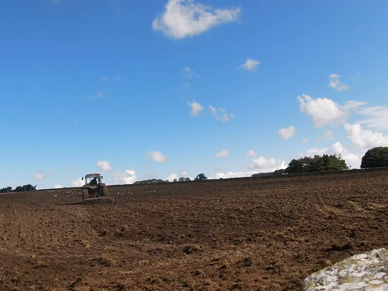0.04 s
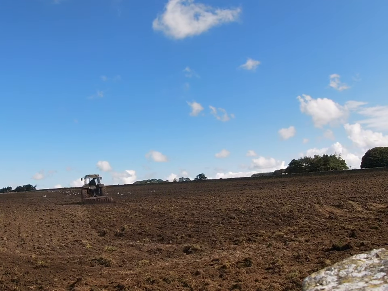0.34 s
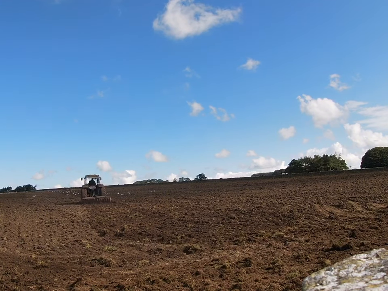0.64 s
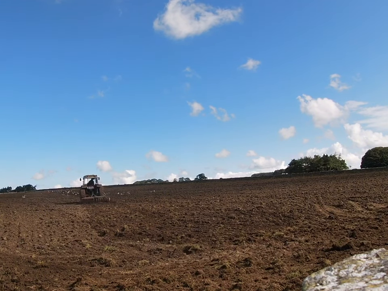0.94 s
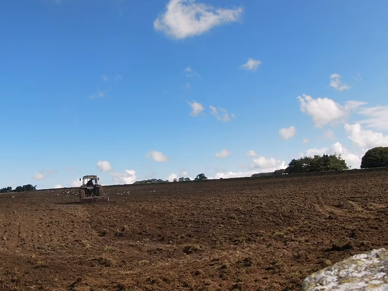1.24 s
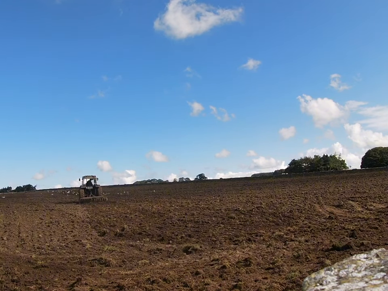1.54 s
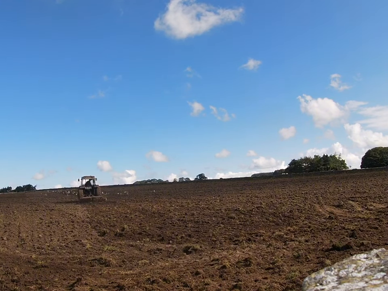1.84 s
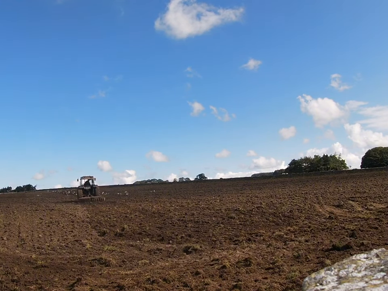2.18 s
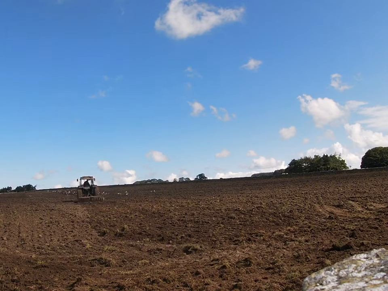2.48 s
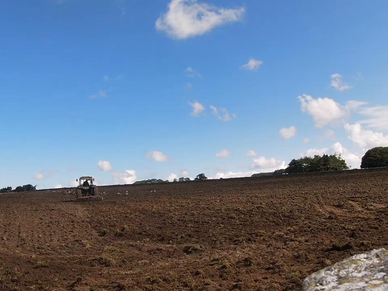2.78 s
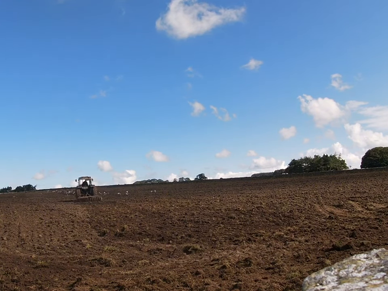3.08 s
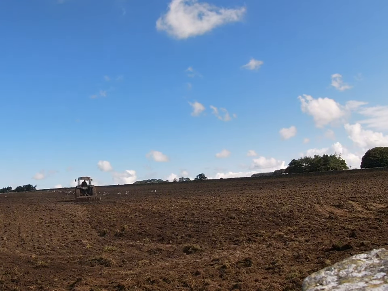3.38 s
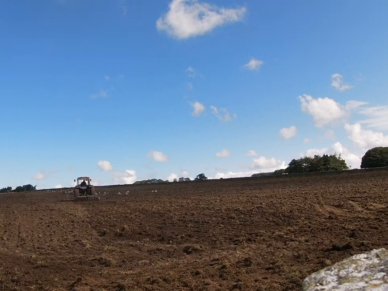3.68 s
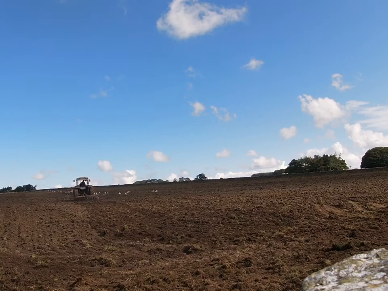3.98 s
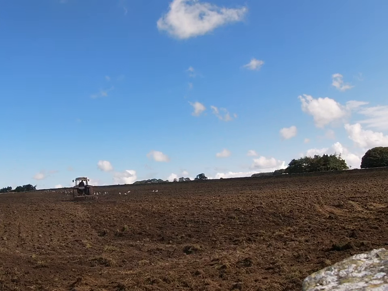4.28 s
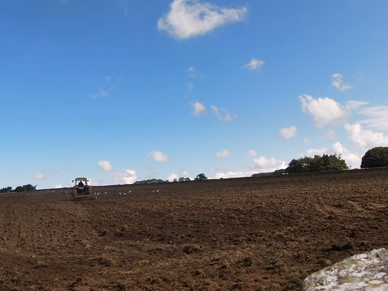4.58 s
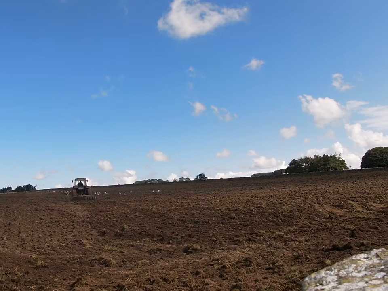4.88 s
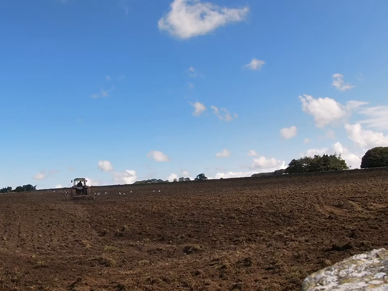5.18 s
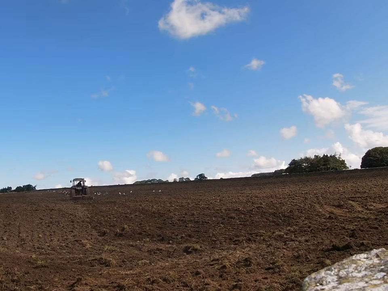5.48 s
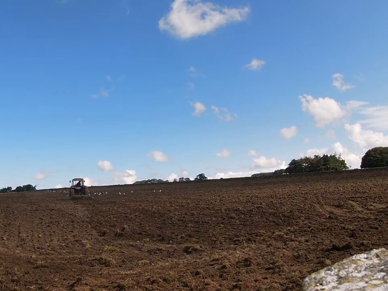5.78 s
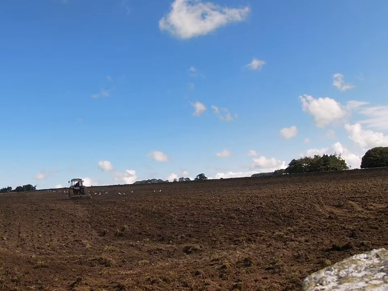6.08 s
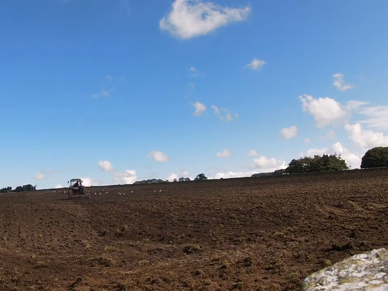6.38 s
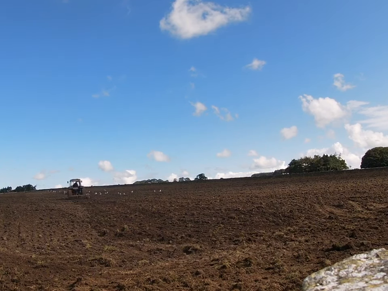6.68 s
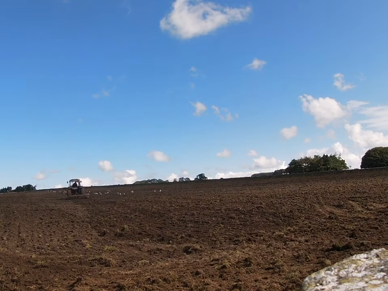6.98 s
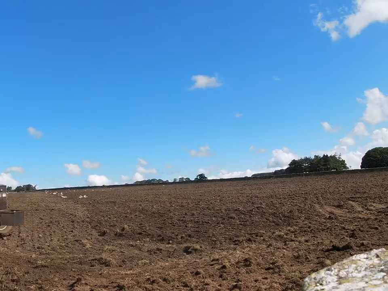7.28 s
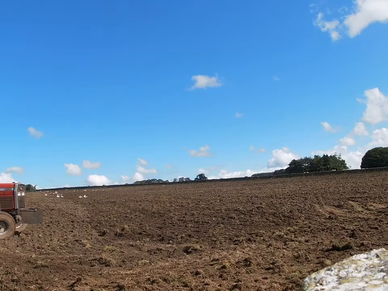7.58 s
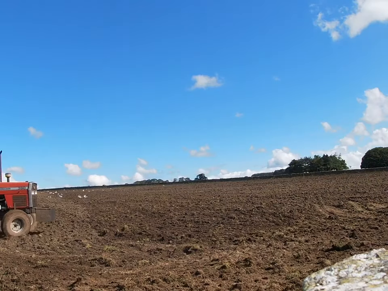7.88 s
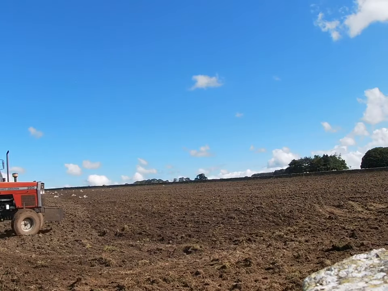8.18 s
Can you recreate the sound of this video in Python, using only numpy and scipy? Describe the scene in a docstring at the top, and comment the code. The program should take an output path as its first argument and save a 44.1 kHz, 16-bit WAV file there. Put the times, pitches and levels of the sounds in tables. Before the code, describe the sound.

From the start, a diesel tractor works far off in an open field: a steady low exhaust drone with lighter rattle and faint gear whine, slowly fading as it moves away. Soil hisses softly along its harrow discs, and stones clink, clank and scrape against the steel at irregular moments, thickest in the first five seconds. A dry bearing gives brief, faint squeaks at about 1.6, 2.5, 3.6, 5.9, 6.5 and 7.2 seconds. Short, low wind gusts thump the microphone around 6 and 6.9 seconds. At about 7.2 seconds the soil and stones stop and the tractor is abruptly close and much louder, with hard diesel knocking under a booming bonnet. The engine picks up until about 7.6 seconds, then sags slightly, while a few more gusts bump the microphone. The radiator fan's rush swells just before the end, at about 8.3 seconds.

```python
"""Far off, a four-cylinder diesel tractor drags disc harrows away over a ploughed field. Its exhaust
drones, soil hisses along the discs, stones clank against them and dry bearings squeak.
From about six seconds on, a few gusts thump the microphone. Just after seven the scene cuts to the
tractor close by: the engine picks up and sags, clattering loudly under a booming bonnet,
and at the very end the radiator fan swells as the nose rolls past."""
import sys
import numpy as np
from scipy import signal
from scipy.fft import rfft, irfft, next_fast_len
from scipy.io import wavfile
from scipy.ndimage import uniform_filter1d, map_coordinates

SR = 44100
rng = np.random.default_rng(int(sys.argv[2]) if len(sys.argv) > 2 else 0)


def inscribe(sig):
    """Save sig as 16-bit PCM at rate SR to the path in sys.argv[1].

    A 1-D sig is mono; a 2-D sig holds one channel per row.
    Samples are clipped to [-1, 1] before scaling.
    """
    pcm = np.round(np.clip(np.atleast_2d(sig).T, -1, 1) * 32767)
    wavfile.write(sys.argv[1], SR, pcm.astype(np.int16))


N = 367794
CLOSE_FROM_S = 7.185
START_M, SPEED_M_PER_S = 30.4, 1.66  # the distant tractor drives straight away


def amp(db):
    """Decibels to gain."""
    return 10 ** (np.asarray(db) / 20)


def unit(x):
    """x scaled to rms 1."""
    return x / np.sqrt(np.mean(x ** 2) + 1e-20)


def clock():
    """The time of each sample in seconds."""
    return np.arange(N) / SR


def curves(rows):
    """One automation curve for each column after the time."""
    times, *columns = np.transpose(rows)
    return [np.interp(clock(), times, column) for column in columns]


def wobble(rate):
    """A smooth random curve, rate knots a second."""
    return map_coordinates(rng.standard_normal(int(N * rate / SR) + 4), [clock() * rate])


def filtered(x, response):
    """x through a gain given as a function of frequency."""
    size = next_fast_len(N + SR // 2)
    return irfft(rfft(x, size) * response(np.fft.rfftfreq(size, 1 / SR)), size)[:N]


def coloured(x, spectrum, rings=()):
    """x through a broad EQ with resonances standing on it, at rms 1."""
    hz, db = np.transpose(spectrum)
    broad = lambda f: np.interp(np.log(f + 1), np.log(hz), db)
    peaks = lambda f: sum(lift / (1 + (2 * (f - centre) / width) ** 2) for centre, width, lift in rings)
    return unit(filtered(x, lambda f: amp(broad(f) + peaks(f))))


def patchy(x, depth_db, size=512):
    """x with random patches of gain in time and frequency."""
    bins = signal.stft(x, nperseg=size)[2]
    patches = uniform_filter1d(rng.standard_normal(bins.shape), size=5, axis=0)
    patches = uniform_filter1d(patches, size=7, axis=1)
    return signal.istft(bins * amp(depth_db * unit(patches)), nperseg=size)[1][:N]


def add(track, start_s, sound):
    """Mix a short sound into the track."""
    part = track[round(start_s * SR):][:len(sound)]
    part += sound[:len(part)]


def spreading_db(s):
    """The level falls as the distance grows."""
    return -20 * np.log10(1 + SPEED_M_PER_S * s / START_M)


def exhaust(firings, orders, firing_db, octave_db, upper_db, waver_db, rumble_db):
    """A drone at the firing rate and its octave; above it, higher tones in turbulent rumble."""
    # Turbulence in the pipe. Each row: frequency in Hz, relative level in dB.
    rumble_eq = [(8, -16.5), (25, -5.5), (65, 9), (95, 1), (130, 5), (185, 0.5), (240, -12), (330, -21.5),
                 (800, -79.5)]
    # the silencer shifts the phase of the higher tones more
    tone = lambda k: np.sqrt(2) * np.cos(2 * np.pi * k * firings + k * k / 3)
    upper = unit(sum(amp(db + waver_db * (0.5 - db / 10) * wobble(14)) * tone(k) for k, db in orders))
    rumble = amp(rumble_db) * coloured(rng.standard_normal(N), rumble_eq)
    burn_db = 0.7 * wobble(35)  # no two firings are equally strong
    drone = amp(firing_db) * tone(1) + amp(octave_db) * tone(2)
    return amp(burn_db) * drone + amp(upper_db) * (upper + rumble)


def clatter(firings, repeat_share, knock_depth, throb_depth, scatter_db):
    """Pistons, valves and injectors knock four times a firing; part of the rattle repeats each cycle."""
    # No two cylinders burn alike. Each entry: one cylinder's trim in dB, in firing order.
    cylinder_db = [0.77, -0.079, 0.11, -0.22]
    cycle = rng.standard_normal(3600)  # one engine cycle, four firings long
    looped = map_coordinates(cycle, [firings / 4 % 1 * len(cycle)], mode="grid-wrap")
    rattle = np.sqrt(repeat_share) * unit(looped) + np.sqrt(1 - repeat_share) * rng.standard_normal(N)
    knocks = firings * 4
    strength = amp(scatter_db * rng.standard_normal(2 ** 12))[knocks.astype(int)]
    blows = 1 + knock_depth * strength * np.exp(-np.pi * (knocks % 1))
    throb = 1 + throb_depth * np.sin(2 * np.pi * firings)  # knocks nearest combustion hit hardest
    return rattle * blows * throb * amp(cylinder_db)[firings.astype(int) % 4]


def gears(firings, meshes, waver_db, backlash):
    """Gear teeth whine in step with the engine; their play unsettles the tones."""
    tone = lambda k: np.sqrt(2) * np.sin(2 * np.pi * k * firings + backlash * wobble(25))
    return sum(amp(db + waver_db * wobble(8)) * tone(k) for k, db in meshes)


def far_tractor(governed_hz=46.65, hunt_hz=.33, ground_hz=450, ground_dip=0.35):
    """From behind and far off, the exhaust drone outweighs the clatter, which drifts in the breeze."""
    # Upper exhaust tones and gear tones. Each row: multiple of the firing rate, relative level in dB.
    orders = [(3, -14), (3.5, -34), (4, -22), (5, -35), (5.6, -39), (6, -42)]
    meshes = [(11, -20), (11.85, -19), (12.6, -25), (17.75, -22), (20, -20), (21.15, -11), (21.9, -21),
              (25, -19), (26.6, -17), (31.5, -21), (38.5, -22), (42, -20)]
    # The clatter from behind. Each row: frequency in Hz, relative level in dB.
    rear_eq = [(150, -8.5), (300, -8.5), (420, 1), (520, 1), (760, -2), (1100, -4), (1200, -4), (1650, -6),
               (1950, -9), (2150, -6.5), (3600, -10.5), (5000, -23.5), (7700, -27), (8200, -41),
               (12000, -61), (14000, -85)]
    # Ringing panels and castings. Each row: centre in Hz, width in Hz, boost in dB.
    rear_rings = [(518, 14, 4), (680, 14, 2), (834, 26, 1.5), (966, 110, 5), (1223, 140, 6), (1473, 140, 6),
                  (1810, 130, 9), (1958, 50, 7)]
    # The fader on the gear whine. Each row: time in seconds, gain in dB.
    whine_fader = [(0, 2), (1.0, 2), (1.6, -2), (3.0, -2), (4.1, 1.5), (4.7, -4.5), (6.0, -3.5), (6.9, 1.5)]
    t = clock()
    firings = np.cumsum(governed_hz + hunt_hz * wobble(3.2)) / SR  # the governor hunts
    driven_m = SPEED_M_PER_S * t
    upper_db = -41.5 - 0.2845 * driven_m  # soft ground takes its share on top of spreading
    clatter_db = -47 - 0.05 * driven_m
    drone = exhaust(firings, orders, firing_db=-26.5, octave_db=-33.5, upper_db=upper_db,
                    waver_db=.5, rumble_db=-0.5)
    knocking = clatter(firings, repeat_share=.28, knock_depth=.45, throb_depth=.14, scatter_db=3)
    rattle = coloured(patchy(knocking, depth_db=0.75, size=2048), rear_eq, rear_rings)
    # the ground swallows the low mids as the distance grows
    low_mids = filtered(rattle, lambda hz: np.exp(-(2 * np.log((hz + 1) / ground_hz)) ** 2))
    rattle -= np.linspace(0, ground_dip, N) * low_mids
    whine = amp(curves(whine_fader)[0]) * gears(firings, meshes, waver_db=3, backlash=0.9)
    breeze_db = 0.37 * wobble(10)
    return amp(spreading_db(t)) * (drone + amp(clatter_db + breeze_db) * (rattle + whine))


def soil(grits_per_s=80, grit_db=-3, grit_decay_s=0.0032, bite_db=2, crumble_db=1.6, trim_db=3.5):
    """Crumbling earth hisses along the discs, swelling as they bite into clods, with ticks of grit."""
    # The fader on the discs' cut. Each row: time in seconds, gain in dB.
    fader = [(0.0, -63), (1.79, -62.5), (1.95, -60.5), (5.28, -68.5), (5.77, -65), (6.01, -62.5),
             (6.91, -67.5), (7.15, -66)]
    # Soil on steel. Each row: frequency in Hz, relative level in dB.
    scrape_eq = [(900, -15.5), (2500, 0), (3700, 8), (5000, -0.5), (5900, 3.5), (6600, -8), (7600, -1),
                 (8250, -18), (8900, -15.5), (9500, -19), (10200, -18), (12500, -43.5), (14000, -70)]
    level_db = curves(fader)[0] + trim_db + bite_db * wobble(5) + crumble_db * wobble(32)
    ticks = (rng.random(N) < grits_per_s / SR) * amp(4.9 * np.minimum(rng.exponential(size=N), 2))
    bursts = signal.lfilter([1], [1, -np.exp(-1 / (grit_decay_s * SR))], ticks)
    grit = unit(patchy(bursts * rng.standard_normal(N), depth_db=6, size=256))
    hiss = patchy(rng.standard_normal(N), depth_db=2.3)
    return amp(level_db) * coloured(hiss + amp(grit_db) * grit, scrape_eq)


def pebbles(count=96, per_s=9, deep_db=-18.5, bright_db=-13.5, clink_hz=3100):
    """Small stones met at random, fading with distance, as rows like those of the large stones."""
    times = np.cumsum(rng.uniform(0, 2, count)) / per_s
    levels = -45 + spreading_db(times) + 2 * rng.standard_normal(count)
    pitches = clink_hz * np.exp(.15 * rng.standard_normal(count))
    return [(s, db, deep_db, bright_db, hz, db - 14, hardness)
            for s, db, hz, hardness in zip(times, levels, pitches, rng.random(count)) if s < CLOSE_FROM_S]


def steel_tones(hz, t):
    """One sine per mode, roughened by the grinding contact, the high ones most."""
    drift = np.cumsum(rng.standard_normal((len(hz), len(t))), axis=1) * np.sqrt(hz) / 7000
    return np.sin(2 * np.pi * (hz * t + drift + rng.random(hz.shape)))


def clack(t, deep_db, bright_db, clink_hz, hardness, snap_s=0.002, grind_db=4.5):
    """Stone on steel: a square blow snaps and is gone, a glancing one swells and scrapes on."""
    hz = np.fft.rfftfreq(len(t), 1 / SR)
    hardness = min(hardness, .95)
    low_db, high_db = deep_db / 2, bright_db / 2
    eq_db = np.interp(hz, [400, 1200, 2700, 4000, 5200, 7700, 9000],
                      [-25, low_db + 3, 0, 0, high_db + 1, high_db, high_db - 9])
    eq_db += 4 * np.exp(-(np.log((hz + 1) / clink_hz) / .17) ** 2)  # a bump at the clink's pitch
    noise = unit(irfft(rfft(rng.standard_normal(len(t))) * amp(eq_db), len(t)))
    grinding = amp(grind_db * unit(uniform_filter1d(rng.standard_normal(len(t)), size=160)))
    rise_s, t60 = 0.0061 * (1 - hardness) ** 3, 0.28 / (1 + hardness)
    scrape = (1 - np.exp(-t / rise_s)) * amp(-60 * t / t60)
    snap = hardness * np.exp(-t / snap_s)
    return noise * (grinding * scrape + snap)


def stones(ring_db=-22.5, clack_db=-16, clink_t60_s=.125):
    """Each stone clacks against a disc, rings it and grinds past; the soil damps the ring quickly."""
    # Large stones. Each row: start in seconds, gain of ring and clack in dB, deep and bright tone
    # controls in dB, clink pitch in Hz, clink gain in dB, hardness of the blow from 0 to 1.
    large_stones = [(0.13, -36.5, -8, -9, 2860, -51, 0.5), (0.191, -47, -18, 2, 4340, -55, .5),
                    (0.4624, -40, -18, -4, 5650, -54, .7), (0.5828, -33.5, -9, -9, 3750, -48, 0.2),
                    (0.8286, -38, -16, -5, 5850, -52, .6), (0.8384, -34, -17, -6, 2480, -51, .5),
                    (0.8692, -39, 2.5, -14, 2930, -53, .45), (1.0329, -30.5, -17, -13, 3670, -44, 1),
                    (1.7185, -41, -10, -36, 2500, -48, .6), (1.806, -41, -15, -9, 3830, -54, .55),
                    (1.8993, -33, -9.5, -14, 3180, -54, .1), (1.9888, -33.5, -17, -10, 3750, -44.5, 0.7),
                    (2.125, -39, -18, -9, 2980, -52, .3), (2.4429, -40.5, -20, 4, 5950, -54, .8),
                    (2.4604, -35, -14, -1, 3970, -50, .6), (2.832, -44, -15, -7, 2500, -53, .3),
                    (2.899, -52, -20, -9, 4900, -55, .6), (2.975, -36.5, -16, -19, 2850, -49, .35),
                    (3.03, -42, -19, -8, 3950, -46, .7), (3.1567, -40, -12, -7, 2850, -57, .5),
                    (3.2324, -35.5, -4, -19, 2910, -51, 0.2), (3.254, -38, -11, -12, 3790, -51, .8),
                    (3.4141, -35.5, -19, -8, 3670, -52, .4), (3.476, -36, -12, -9, 3820, -54, 0.3),
                    (3.778, -40, -19, -15, 3220, -50, .6), (3.8475, -30.5, -6, -27, 3030, -42.5, .6),
                    (3.8738, -34.5, -4, -12, 2880, -48, .05), (3.9469, -40, -11, -20, 2400, -48, .2),
                    (4.3705, -42, -10, -19, 2540, -54, .65), (4.4572, -34, -13, -17, 3860, -48, .9),
                    (4.564, -36, -7.5, -17, 2530, -53, 0.2), (4.689, -45, -16, -8, 5860, -60, .6),
                    (4.718, -36, -22, -8, 3850, -46, 0.8), (4.7437, -36.5, -17, -9, 4040, -50, .3),
                    (4.8935, -36.5, -11, -22, 2580, -44, 0.7), (5.354, -44, -11, -20, 3380, -51, 0.8),
                    (6.0194, -39, -6, -9, 2820, -56, 0.2), (6.0926, -35.5, -9, -25, 3180, -52, 0.3),
                    (6.1244, -46, -12, -24, 2820, -52, .5), (6.225, -41, -18, -4, 2790, -52, .05),
                    (6.2565, -42, -15, -1, 2780, -46, 0.3), (6.6578, -39, -8, -8, 3190, -60, 0.4),
                    (6.858, -37.5, -14, -12, 4080, -55, .1), (6.887, -38, -13, -25, 2820, -51, .3),
                    (7.0289, -41.5, -9, -29, 2510, -48, .55)]
    # A harrow disc's modes. Each row: frequency in Hz, relative level in dB, t60 in seconds.
    disc_modes = [(1180, 6.5, 0.28), (1244, 8, 0.25), (1350, -3.5, 0.12), (1914, 2.5, 0.2),
                  (2120, -5.5, 0.3), (2480, 0.5, 0.28), (2886, 2.5, 0.25), (3180, -0.5, 0.15),
                  (3550, -3, 0.24), (3770, 1, 0.18), (4500, 0, 0.18), (5470, 5, 0.093), (5940, 7, 0.12),
                  (7290, 6, 0.1)]
    # Treble lost across the field. Each row: frequency in Hz, gain in dB.
    air_eq = [(5000, 0.5), (7700, -2), (8300, -12.5), (10300, -14.5), (12500, -33), (14000, -55.5)]
    track, t = np.zeros(N), np.arange(SR // 3) / SR
    disc_hz, mode_db, t60 = np.transpose(disc_modes)[:, :, None]
    for start_s, db, deep_db, bright_db, clink_hz, clink_db, hardness in [*large_stones, *pebbles()]:
        hz = disc_hz * np.exp(.008 * rng.standard_normal(disc_hz.shape))  # no two discs ring alike
        # heavy stones stir the low modes, sharp ones the high; the point of contact adds its own clink
        eq_db = np.interp(hz, [1400, 2200, 4520, 5830], [deep_db + 7, 0, 0, bright_db + 3])
        envelopes = amp(mode_db + eq_db + rng.normal(0, 2, hz.shape) - 60 * t / t60)
        ring = amp(db + ring_db) * np.sum(envelopes * steel_tones(hz, t), axis=0)
        clink = amp(clink_db - 60 * t / clink_t60_s) * steel_tones(np.array([[clink_hz]]), t)[0]
        blow = amp(db + clack_db) * clack(t, deep_db, bright_db, clink_hz, hardness)
        add(track, start_s, ring + clink + blow)
    return filtered(track, lambda hz: amp(np.interp(hz, *np.transpose(air_eq))))


def squeaks(jitter_hz=110):
    """A dry bearing sticks and slips in short, hoarse glides."""
    # Bearing slips. Each row: start and length in seconds, first and last pitch in Hz, level in dB.
    slips = [(1.555, 0.068, 2650, 3750, -52), (1.612, 0.022, 5960, 5960, -56),
             (2.453, 0.02, 5770, 5930, -44), (3.563, 0.073, 3120, 2910, -54),
             (5.881, 0.035, 3110, 3230, -53), (6.492, 0.058, 2990, 3040, -53),
             (7.221, 0.051, 4360, 4220, -46)]
    track = np.zeros(N)
    for start_s, length_s, from_hz, to_hz, db in slips:
        progress = np.linspace(0, 1, int(length_s * SR))
        hz = from_hz + (to_hz - from_hz) * progress + jitter_hz * wobble(800)[:len(progress)]
        envelope = amp(db) * np.sqrt(2) * np.sin(np.pi * progress ** 0.98)
        add(track, start_s, envelope * np.sin(2 * np.pi * np.cumsum(hz) / SR))
    return track


def wind():
    """Each short gust sheds an eddy that shoves the microphone, wrapped in buffeting."""
    # Gusts. Each row: centre and half-width in seconds, eddy pitch in Hz, level in dB,
    # buffeting in dB against the eddy.
    gusts = [(6.019, 0.016, 41, -24, -6.5), (6.067, 0.011, 114, -24.5, -1.5),
             (6.874, 0.053, 60, -28.5, -13), (7.567, 0.1, 23, -24, -10), (7.872, 0.04, 19, -24.5, -10),
             (8.102, 0.049, 24, -28, -0.5)]
    # The buffeting. Each row: frequency in Hz, relative level in dB.
    buffet_eq = [(10, -14.5), (25, -7), (90, 7), (140, -8.5), (240, -21), (400, -37), (1000, -91)]
    track, t = np.zeros(N), clock()
    buffet = coloured(rng.standard_normal(N), buffet_eq)
    for centre_s, width_s, hz, db, buffet_db in gusts:
        swell = amp(db) * np.exp(-((t - centre_s) / width_s) ** 2)
        eddy = np.sin(2 * np.pi * hz * (t - centre_s))
        track += swell * (eddy + amp(buffet_db) * buffet)
    return track


def bonnet(knocking, rate_hz, firings, order=14, resonance_hz=674, width_hz=30):
    """The bonnet booms with the knocks; one engine order sings as it crosses the sharpest resonance."""
    # The broad panel resonance. Each row: frequency in Hz, relative level in dB.
    panel_eq = [(350, -45), (560, -11), (675, 3), (780, -8), (1200, -40.5), (4000, -110)]
    # The fader on the bonnet's roar. Each row: time in seconds, gain in dB.
    fader = [(7.19, -1), (7.28, 1), (7.335, 5), (7.4, 0), (7.55, 1), (7.68, 3), (7.76, 2), (7.82, -2),
             (7.9, -.5), (8.0, -1), (8.34, -.5)]
    boom = amp(-36 + wobble(9.4)) * coloured(knocking, panel_eq)
    response = 1 / np.sqrt(1 + (2 * (order * rate_hz - resonance_hz) / width_hz) ** 2)
    hum_gain = np.sqrt(2) * amp(-35.5 + 2 * wobble(20)) * response
    hum = hum_gain * np.sin(2 * np.pi * order * firings + .35 * wobble(60))
    return amp(curves(fader)[0]) * (boom + hum)


def fan(level_db, rise_from_s=8.1, rise_db_per_s=14):
    """Air rushes through the radiator, louder as it comes abreast."""
    # The rush of air. Each row: frequency in Hz, relative level in dB.
    rush_eq = [(500, -27), (1900, -8.5), (2600, 2), (3200, -5.5), (4300, -20), (6200, -26), (7300, -28),
               (11000, -42), (14500, -47)]
    rise_db = rise_db_per_s * np.maximum(clock() - rise_from_s, 0)
    return amp(level_db + rise_db) * coloured(patchy(rng.standard_normal(N), depth_db=3), rush_eq)


def near_tractor(pull_s=0.23):
    """Beside the bonnet, the block and its panels ring with every knock over the exhaust and fan."""
    # The engine picks up, then sags. Each row: time in seconds, firing rate in Hz.
    revs = [(7.2, 45.9), (7.35, 48.3), (7.45, 50.2), (7.6, 50.7), (7.75, 49.8), (7.95, 49.0), (8.34, 48.15)]
    # The drone swells and dips. Each row: time in seconds, firing tone in dB, its octave in dB.
    drone_faders = [(7.2, -21.5, -21.5), (7.3, -24.5, -23), (7.47, -21.5, -27.5), (7.62, -26.5, -27.5),
                    (7.81, -21.5, -30), (7.87, -30, -30.5), (7.95, -34, -25.5), (8.04, -22, -29.5),
                    (8.2, -27.5, -28), (8.34, -28, -26.5)]
    # Upper exhaust tones and gear tones. Each row: multiple of the firing rate, relative level in dB.
    orders = [(2.5, -30), (3, -18), (3.5, -20), (4, -16)]
    meshes = [(12, -17), (32.5, -21), (42.1, -18)]
    # The clatter from the side. Each row: frequency in Hz, relative level in dB.
    flank_eq = [(150, -3.5), (300, -8), (420, -2.5), (520, -2), (700, -4.5), (1060, -1.5), (1320, -7),
                (1600, -2), (2100, -7.5), (2450, -15), (3300, -20), (4300, -21.5), (6200, -26),
                (7200, -44.5), (14000, -63)]
    # Ringing panels and castings. Each row: centre in Hz, width in Hz, boost in dB.
    flank_rings = [(1030, 100, 5.4), (1760, 79, 2.9), (1980, 64, 1.5), (2720, 70, 3.5), (3650, 170, 10.2),
                   (4200, 550, 9.2), (5890, 680, 7.3), (8640, 1100, 9.8)]
    rate_hz, = curves(revs)
    firings = np.cumsum(rate_hz) / SR
    pull = np.exp(-((clock() - CLOSE_FROM_S) / pull_s) ** 2)  # it works harder while picking up
    drone = exhaust(firings, orders, *curves(drone_faders), upper_db=-38 + pull,
                    waver_db=0, rumble_db=6.5)
    knocking = clatter(firings, repeat_share=.6, knock_depth=1, throb_depth=.15, scatter_db=2)
    # the colour shifts as panels and wheels move past
    block = coloured(patchy(knocking, depth_db=1.66, size=2048), flank_eq, flank_rings)
    whine = gears(firings, meshes, waver_db=4.5, backlash=0.28)
    machinery = amp(-31 + 2.5 * pull) * (block + whine)
    return drone + machinery + bonnet(knocking, rate_hz, firings) + fan(level_db=-45.5 + 2.5 * pull)


def scene():
    """The distant harrowing cuts to the tractor close by; gusts and squeaks run across the cut."""
    close = np.clip((clock() - CLOSE_FROM_S) / .002, 0, 1)
    far = 1 - close
    tractor = far * far_tractor() + close * near_tractor()
    return (tractor + wind() + squeaks() + far * (soil() + stones()))[None]


def record(dry):
    """A brick-wall low-pass takes off the very top."""
    return filtered(dry[0], lambda hz: hz < 14900)[None]


dry = scene()
out = record(dry)
inscribe(out)
```